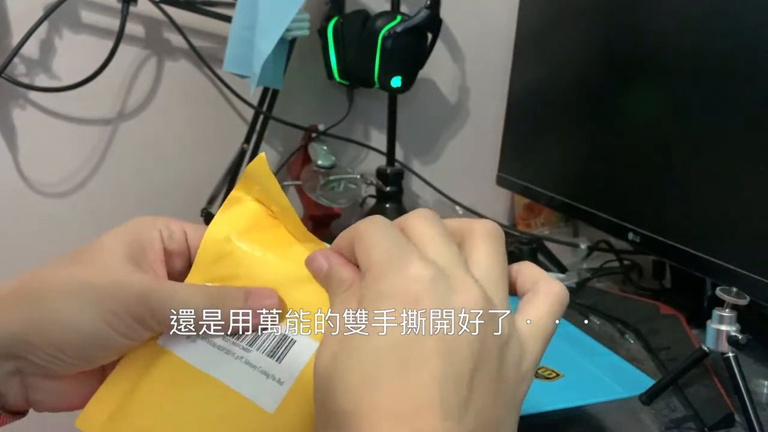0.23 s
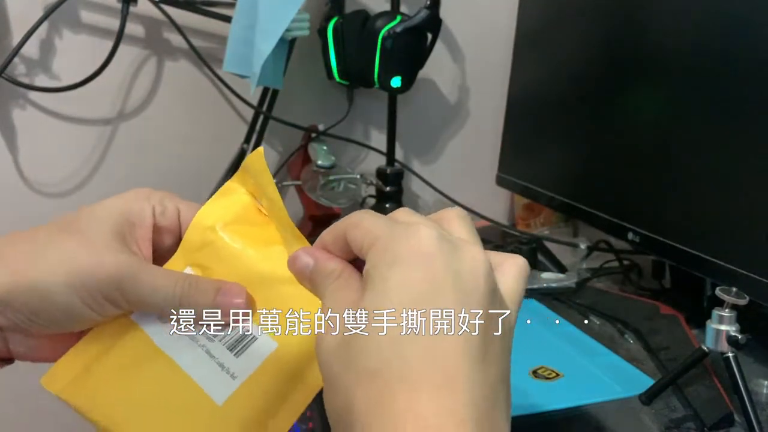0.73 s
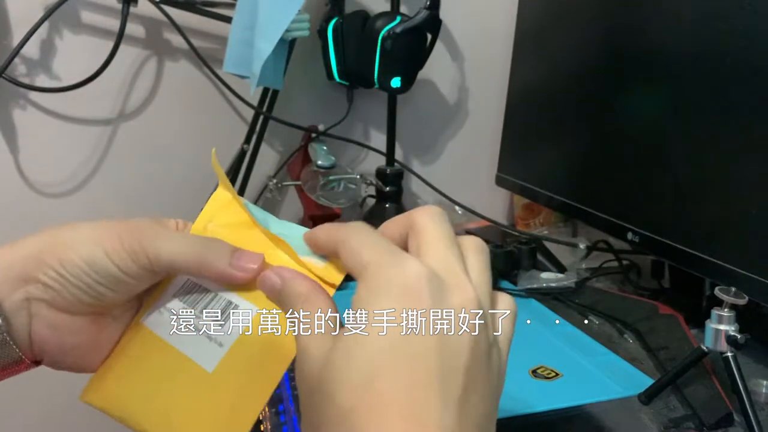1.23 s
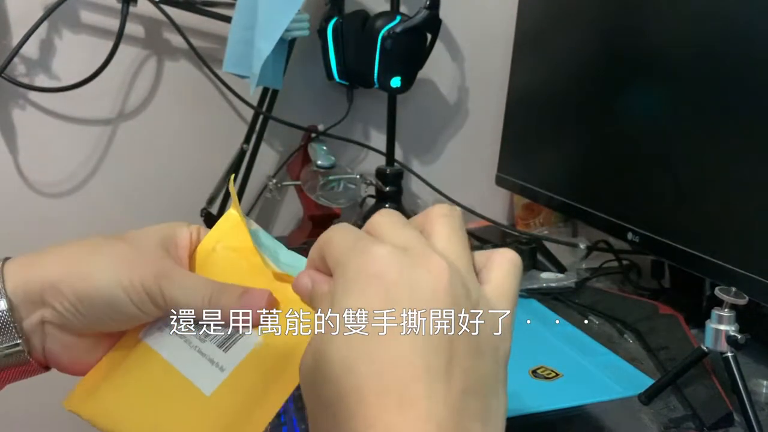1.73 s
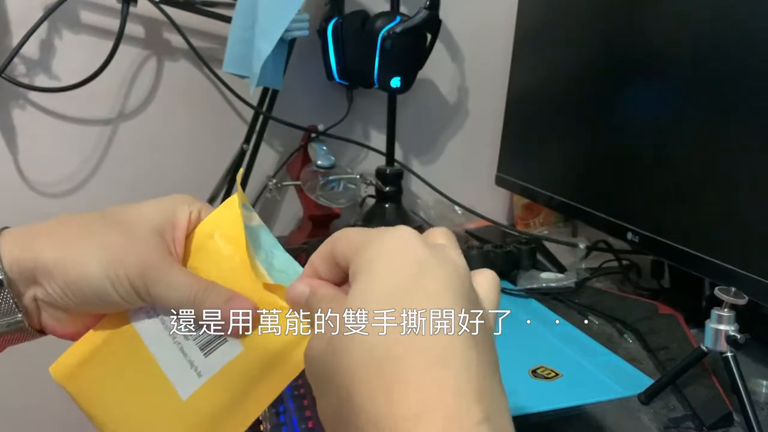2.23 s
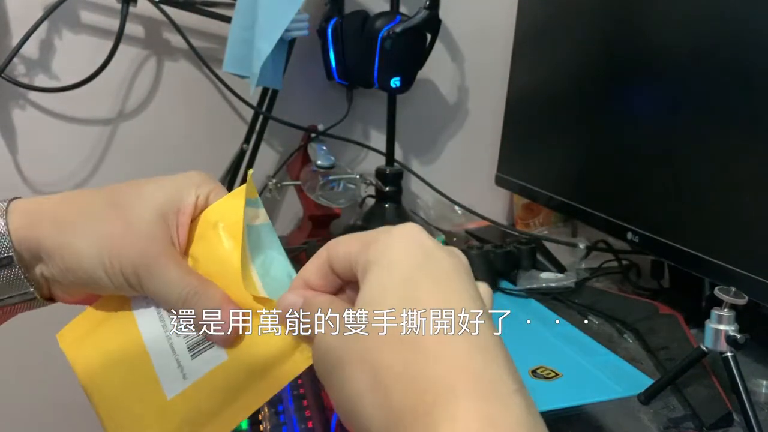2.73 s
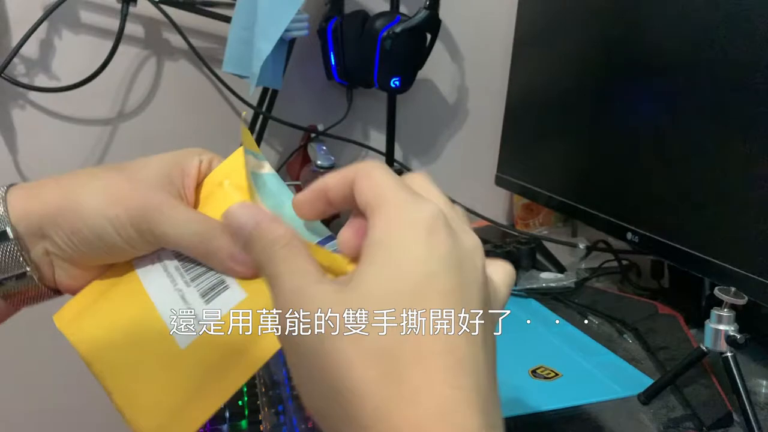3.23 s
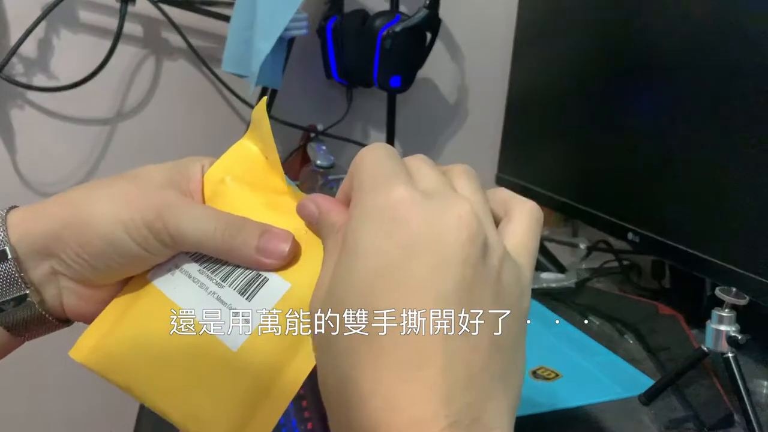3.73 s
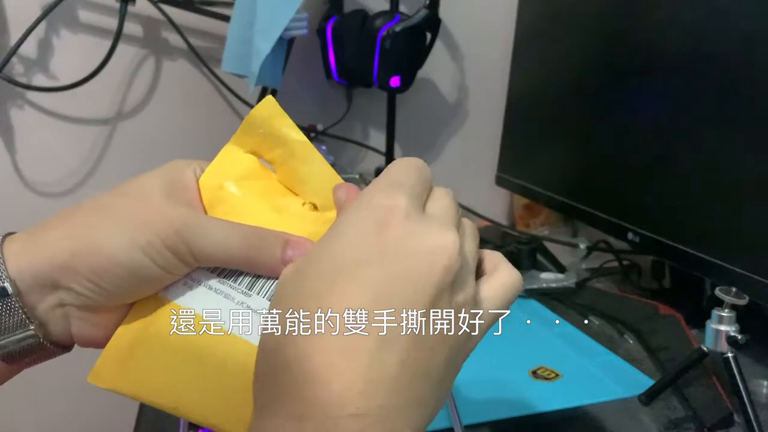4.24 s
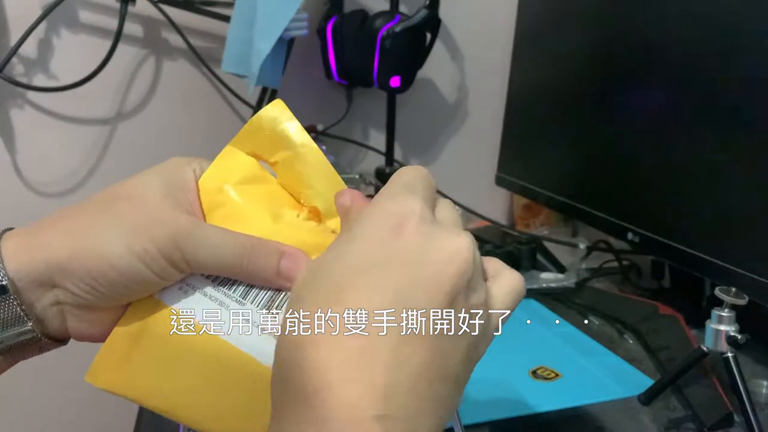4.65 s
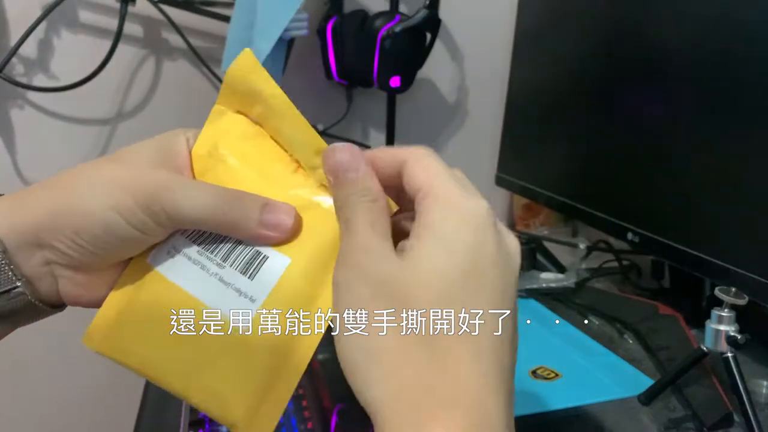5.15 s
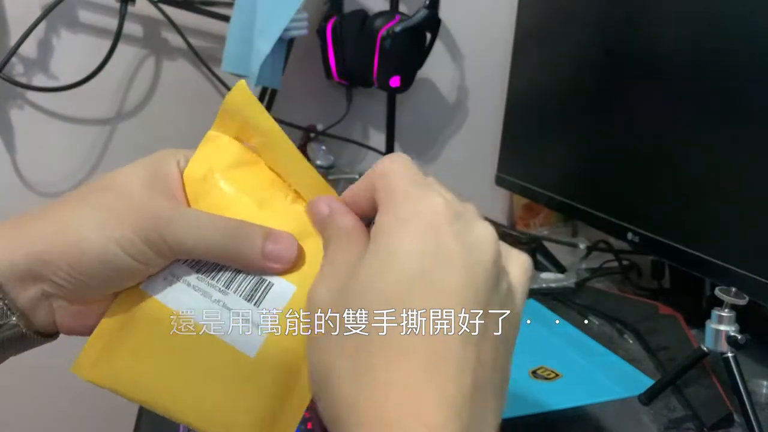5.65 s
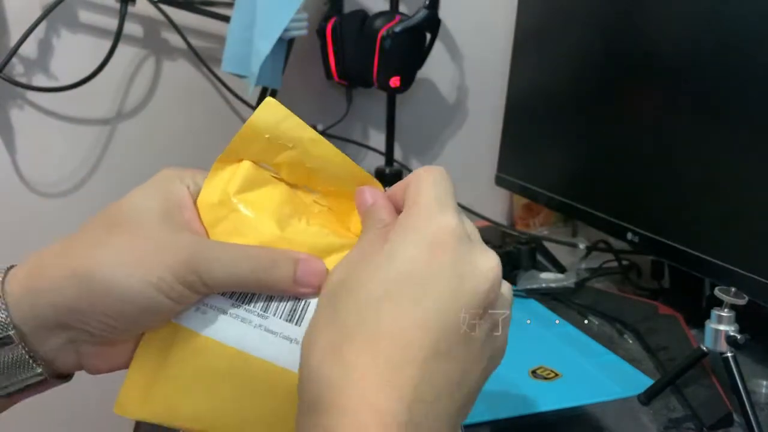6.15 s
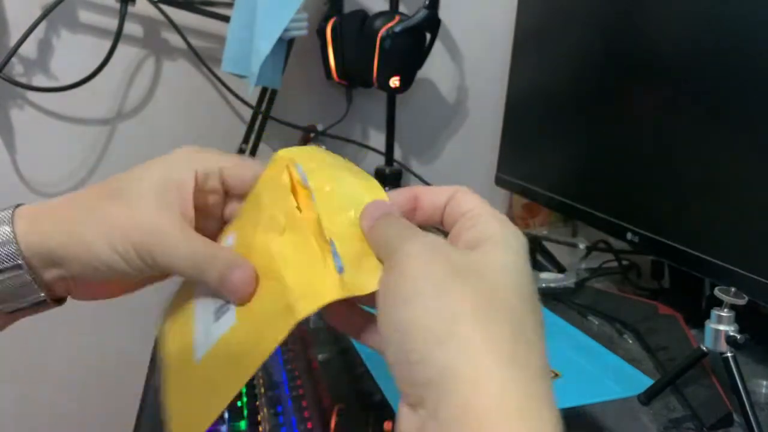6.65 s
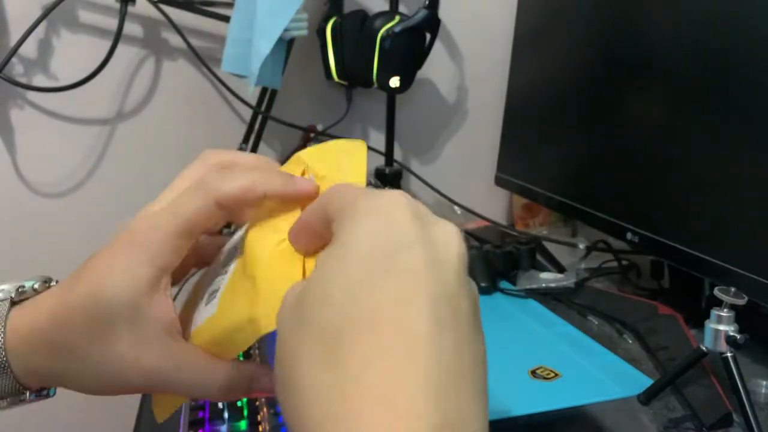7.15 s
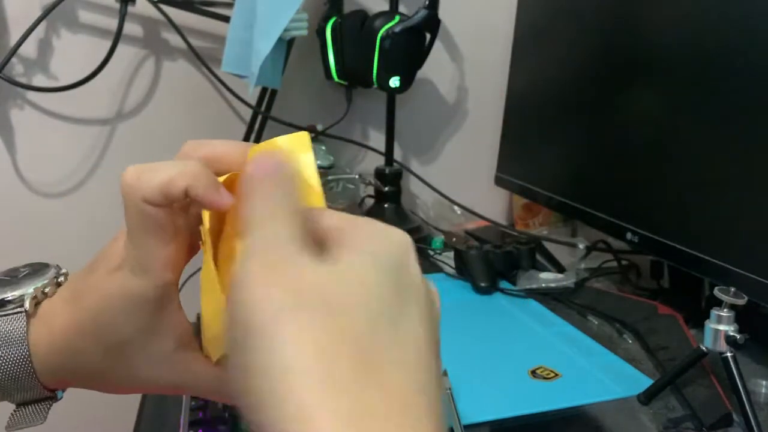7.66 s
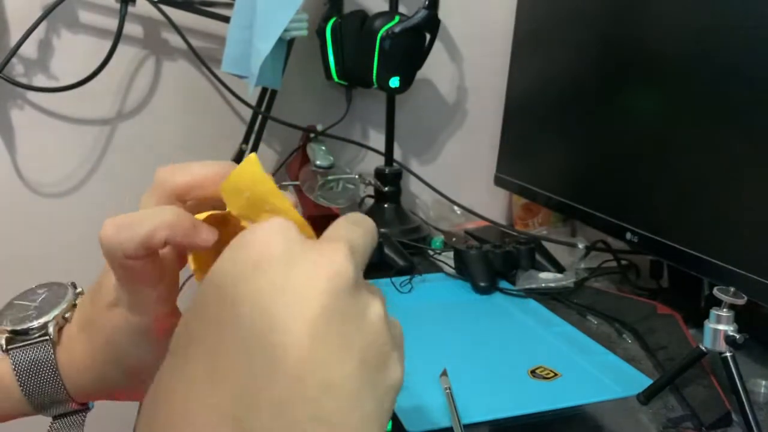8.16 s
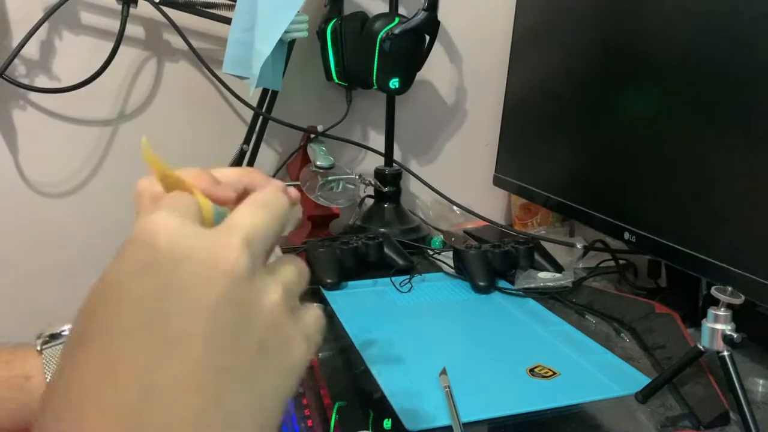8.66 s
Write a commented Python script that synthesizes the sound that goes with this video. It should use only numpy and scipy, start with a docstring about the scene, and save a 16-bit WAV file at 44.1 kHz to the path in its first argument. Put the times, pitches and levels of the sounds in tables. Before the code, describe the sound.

Close, dry paper crackling and sticky popping as a padded mailer is worked open by hand over a faint low room rumble.

```python
"""A low room rumble (shaped noise) and faint microphone hiss (white noise) run throughout.
Hands pick at, peel and tear a padded paper envelope close by: rustle is friction hiss plus tiny creases,
with small creases under the grip and loud snaps as dispersed clicks; a small quiet room adds its tail.
After 5 s a bit of metal rings once (a decaying sine).
After 7 s the packet is bumped four times (sagging, decaying sines)."""
import sys
import numpy as np
from scipy import signal
from scipy.fft import rfft, irfft
from scipy.io import wavfile
from scipy.ndimage import uniform_filter1d

SR = 44100
rng = np.random.default_rng(int(sys.argv[2]) if len(sys.argv) > 2 else 0)


def file_out(sig):
    """Save sig as 16-bit WAV at sys.argv[1]."""
    # one column per channel
    cols = np.atleast_2d(sig).T
    # limit, then scale
    lim = np.clip(cols, -1, 1)
    pcm = np.round(lim * 32767).astype(np.int16)
    wavfile.write(sys.argv[1], SR, pcm)


def volts_from_decibels(level):
    """Turn decibel levels (scalar or array-like) into linear amplitude factors."""
    exponent = np.asarray(level, float) / 20
    return 10 ** exponent


N = 392490


def evened(x):
    """Scales to rms 1."""
    return x / np.sqrt(np.mean(x ** 2) + 1e-20)


def read(points, hz):
    """Interpolates a (f/Hz, value) table on a log-frequency axis."""
    f, value = np.transpose(points)
    return np.interp(np.log(hz + 1), np.log(f + 1), value)


def add(mix, s, sound):
    """Mixes a sound in at time s."""
    part = mix[max(round(s * SR), 0):][:len(sound)]
    part += sound[:len(part)]


# rumble spectrum: f/Hz, relative density/dB
RUMBLE_SHAPE = [(15, -26), (33, 1), (42, -2), (240, -0.5), (609, -6), (680, -7), (948, -10.5),
                (1300, -12.5), (1510, -13.5), (2060, -22.5), (2690, -29), (3510, -25.5), (5000, -34),
                (6500, -70), (11000, -120)]
# rumble level over time: t/s, level/dB
RUMBLE_LEVEL = [(0, -54.5), (2.5, -56.5), (4.9, -56), (5.2, -55), (8.9, -55.5)]
# room resonances: f/Hz, width/Hz, boost/dB
RESONANCES = [(67.4, 15, 7.5), (135, 17, 6), (198.5, 9.4, 8.5), (241.5, 64, 5), (354.5, 51, 3)]


def rumble(swell_rms_db=0.35):
    """Gently swelling noise, strongest where the room resonates."""
    hz = np.fft.rfftfreq(N, 1 / SR)
    boost_db = sum(db / (1 + (2 * (hz - f) / width) ** 2) for f, width, db in RESONANCES)
    shape = volts_from_decibels(read(RUMBLE_SHAPE, hz) + boost_db)
    noise = evened(irfft(rfft(rng.standard_normal(N)) * shape, N))
    t = np.arange(N) / SR
    swell = sum(np.sin(2 * np.pi * (f * t + rng.random())) / np.sqrt(f) for f in np.geomspace(.15, 2, 8))
    level_db = np.interp(t, *np.transpose(RUMBLE_LEVEL)) + swell_rms_db * evened(swell)
    return volts_from_decibels(level_db) * noise


def hiss(rms_db=-99.0):
    """Faint even hiss of the microphone."""
    return volts_from_decibels(rms_db) * rng.standard_normal(N)


# rustle levels below are ahead of the paper colour
# grip that never lets go: t/s, rustle level/dB, brightness/(dB/octave), small crease base peak/dB
GRIP = [(0.0, -54.5, -2, -41.5), (0.2, -58, -9, -53.5), (0.89, -65, -1, -51), (1.2, -56.5, -7, -41),
        (1.75, -61, 2, -56), (1.92, -65, -6, -51.5), (2.2, -70, -3, -60), (2.54, -66, -2.5, -54.5),
        (3.07, -68.5, -2.1, -57.5), (3.22, -51.5, -2.5, -46), (3.5, -62, -9, -48.5), (3.9, -71.5, 4, -54),
        (4.05, -57.5, -4.5, -51), (4.22, -59, 4, -43.5), (4.45, -59, 10, -41), (4.69, -86, -6, -55.5),
        (5.3, -51, 2, -45.5), (5.42, -68.5, -15, -59), (6.02, -68.5, -8, -50.5), (6.42, -55, -2.5, -40.5),
        (6.52, -59, -1, -53), (6.93, -61.5, -3.5, -46), (7.18, -50.5, -0.5, -41), (7.3, -63, 0, -51),
        (7.53, -68, 2, -41), (7.7, -60, 0.4, -41), (7.97, -54, 1.5, -39.5), (8.42, -60.5, -4, -56),
        (8.79, -52, 0, -49.5), (8.9, -59, -3, -52)]
# sheet jerks free, rustle jumps up and fades: t/s, peak level/dB, fade/(dB/s), brightness/(dB/octave), flap f/Hz
JERKS = [(0.102, -41, 160, 0, 1430), (1.093, -42, 92, -3.5, 2930), (1.165, -35.5, 300, -1, 1780),
         (1.762, -34.5, 580, -0.3, 1610), (2.124, -41, 316, -1.5, 2030), (3.238, -32.5, 562, -1.3, 5600),
         (3.634, -58.5, 60, -3, 1130), (3.893, -56.5, 208, -8, 1600), (3.975, -49, 282, -5, 1790),
         (4.37, -39, 144, 0.7, 910), (4.557, -45, 177, 2.5, 1600), (5.2, -38, 240, -4, 1450),
         (5.298, -40.5, 204, -1.5, 875), (5.352, -49, 382, -5.5, 3240), (5.661, -52.5, 143, -0.2, 1590),
         (5.756, -33.5, 168, -1, 3800), (5.913, -47, 177, 3, 1130), (6.327, -23.5, 400, -0.5, 1450),
         (6.587, -40, 250, 1, 1590), (6.953, -47.5, 700, -16, 1290), (7.578, -44, 111, -3, 7200),
         (7.631, -36.5, 283, -1, 1430), (7.986, -46, 54, -1, 1600), (8.073, -37.5, 205, -8, 2600),
         (8.207, -44.5, 73, -1.5, 1050), (8.322, -38.5, 272, 1.5, 2230)]
# finger slides over the sheet: middle t/s, peak level/dB, length/s, brightness/(dB/octave), flap f/Hz
SLIDES = [(0.083, -47.5, .07, -3, 2500), (1.023, -45.5, 0.16, 0.5, 2200), (1.291, -42, 0.092, -0.5, 3600),
          (1.398, -43, 0.1, -0.5, 1600), (1.53, -47, .12, -2.5, 3460), (1.665, -43.5, 0.12, -5.5, 2820),
          (1.6, -52.5, 0.15, -2, 3500), (1.828, -44.5, 0.078, -2.5, 1670), (3.317, -52, 0.19, -4, 1690),
          (3.47, -52.5, 0.2, -2, 1480), (3.578, -61, .09, 2, 1600), (4.32, -55, 0.34, 1.5, 1270),
          (4.897, -57, 0.26, -6.5, 1560), (5.14, -48, 0.11, -1.5, 890), (5.591, -48, 0.069, -2.2, 1610),
          (6.259, -48.5, 0.14, -2, 3600), (6.318, -41, .03, 0, 1500), (6.66, -45, 0.18, -2.1, 4020),
          (6.777, -46, 0.18, 2.5, 3440), (7.231, -41.5, 0.074, -2.5, 5300), (7.419, -47, 0.17, -2.5, 5660),
          (7.518, -47, 0.12, -1, 880), (8.043, -40, 0.094, 0.1, 1160), (8.24, -40, .07, -3.5, 1050),
          (8.283, -38.5, 0.2, -2.5, 1440), (8.539, -44, 0.11, -2, 1610), (8.697, -49, 0.17, -5.5, 2030)]


def handling(t, grip_flap_hz=1400, jerk_rise_db_per_s=1602, slide_ends_db=-19):
    """Rustle level, brightness and flap pitch: grip, jerks and slides add in power, which weights their colour."""
    s, grip_db, grip_tilt, _ = np.transpose(GRIP)
    at, db, fade, jerk_tilt, jerk_hz = np.transpose(JERKS)[:, :, None]
    jerks_db = db - np.where(t > at, fade, -jerk_rise_db_per_s) * (t - at)
    mid, top_db, length, slide_tilt, slide_hz = np.transpose(SLIDES)[:, :, None]
    slides_db = top_db + slide_ends_db * (2 * (t - mid) / length) ** 2
    power = volts_from_decibels(2 * np.vstack([np.interp(t, s, grip_db), jerks_db, slides_db]))
    share = power / power.sum(0)
    tilt = np.interp(t, s, grip_tilt) * share[0]
    tilt = tilt + (np.vstack([jerk_tilt, slide_tilt]) * share[1:]).sum(0)
    flap_log2_hz = (np.log2(np.vstack([[grip_flap_hz], jerk_hz, slide_hz])) * share).sum(0)
    return 10 * np.log10(power.sum(0)), tilt, flap_log2_hz


def snap(hz, low_db, high_db, luck, lag_ms, ring_db=6, ring_octaves=.3, spread_ms=0.89):
    """One crease: a click whose treble arrives first, as bending waves run faster at high pitch."""
    f = np.fft.rfftfreq(1024, 1 / SR) + 1
    colour_db = read([(60, low_db - 58), (250, low_db - 8), (600, low_db - 5.0), (1300, low_db + 0.055),
                      (2600, 0.064), (6000, 0.28), (9000, high_db + 0.42),
                      (12500, high_db - 4.0), (16000, high_db - 7.5)], f)
    colour_db = colour_db + ring_db * np.exp(-(np.log2(f / hz) / ring_octaves) ** 2)
    phase = -4 * np.pi * lag_ms / 1000 * np.sqrt(1000 * f)  # delay = lag x sqrt(1 kHz / f)
    t = np.arange(len(luck)) / SR
    folds = .13 * luck ** 3 * np.exp(-t * 1000 / spread_ms)  # the crease gives way in a few quick slips
    folds[0] = 1
    x = irfft(volts_from_decibels(colour_db) * np.exp(1j * phase) * rfft(folds, 1024))
    x = np.roll(x, 88 - np.argmax(abs(x)))[:896]  # peak 2 ms in
    x = x * signal.windows.tukey(896, .1)
    return x / abs(x).max()


# paper colour: f/Hz, relative density/dB
PAPER = [(80, -52), (300, -15), (700, -6), (1500, -9), (3500, -7), (6000, -6), (9000, -11.5),
         (13000, -11.5), (16500, -23.5)]


def rustle(hiss_db=1.0, grains_db=-2, patchy_db=2.48, flicker_db=2.0):
    """Skin drags on the sheet: patchy friction hiss and a spray of tiny creases."""
    kinds, grains_per_s, flap_db, flap_octaves = 18, 600, 7, .28
    size = volts_from_decibels(3.0 * np.minimum(rng.exponential(1, N), 3.8))
    size = size * (rng.random(N) < grains_per_s / SR)
    kind, grains = rng.integers(0, kinds, N), np.zeros(N)
    for k, ring_hz in enumerate(np.geomspace(1000, 12000, kinds)):
        shape = snap(ring_hz, 0.95, 2.5, rng.standard_normal(160), 1.5, ring_db=6.5, spread_ms=0.27)
        grains += signal.oaconvolve(size * (kind == k), shape)[:N]
    drive = volts_from_decibels(hiss_db) * rng.standard_normal(N) + volts_from_decibels(grains_db) * evened(grains)
    hz, t, z = signal.stft(drive, SR, nperseg=256, noverlap=192)
    patches = uniform_filter1d(rng.standard_normal(z.shape[::-1]), 14, 0)  # along time
    patches = evened(uniform_filter1d(patches, 8, 1)).T  # along frequency
    flicker = evened(uniform_filter1d(rng.standard_normal(len(t)), 5))
    level_db, tilt, flap_log2_hz = handling(t)
    octaves = np.log2(np.maximum(hz, 2200)[:, None] / 4000)
    colour_db = read(PAPER, hz)[:, None] + octaves * tilt
    from_flap = np.log2(hz[:, None] + 1) - flap_log2_hz
    colour_db += flap_db * np.exp(-(from_flap / flap_octaves) ** 2)
    z = z * volts_from_decibels(colour_db + patchy_db * patches + flicker_db * flicker)
    sheet = signal.istft(z, SR, nperseg=256, noverlap=192)[1][:N]
    return volts_from_decibels(np.interp(np.arange(N) / SR, t, level_db)) * sheet


def creases(per_s=32, spread_db=1.5):
    """Small creases give way at random under the grip, each with its own colour."""
    s, _, _, level_db = np.transpose(GRIP)
    count = round(per_s * N / SR)
    out, luck, pick = np.zeros(N), rng.standard_normal((count, 243)), rng.random((count, 3))
    for row, (when, pitch, size) in zip(luck, pick):
        at = when * N / SR
        hz = 1300 * (11000 / 1300) ** pitch ** .6
        db = np.interp(at, s, level_db) - spread_db * np.log(1 - .97 * size)
        low_db = 3 - 8 * pitch + 5 * row[1]  # high rings are thin and bright
        high_db = -16 + 19 * pitch + 4 * row[2]
        lag_ms = 1.4 * np.exp(.3 * row[0])
        add(out, at, volts_from_decibels(db) * snap(hz, low_db, high_db, row[3:], lag_ms, ring_db=13.5, ring_octaves=.6))
    return out


# room decay: f/Hz, t60/s
ROOM_T60 = [(500, 0.18), (1500, 0.15), (4000, 0.11), (10000, 0.094)]


def room(x):
    """Three tails of sparse taps, taken in turn, each band dying at its own speed."""
    out, half_turns = np.zeros(N), np.arange(N) / SR * 7
    for k in range(3):
        taps = np.zeros(SR // 3)
        at = np.arange(90, len(taps) - 12, 12)  # samples
        taps[at + rng.integers(0, 12, len(at))] = rng.choice([-1., 1.], len(at))
        hz, t, z = signal.stft(taps, SR, nperseg=128)
        decay = volts_from_decibels(-60 * t / read(ROOM_T60, hz)[:, None])
        tail = signal.istft(z * decay, SR, nperseg=128)[1]
        share = np.sqrt(2 / 3) * np.cos(np.pi * (half_turns + k / 3))  # powers sum to 1
        out += signal.oaconvolve(x * share, tail / np.linalg.norm(tail))[:N]
    return out


# loud creases and glue spots: t/s, peak level/dB, ring f/Hz, low part/dB, high part/dB
SNAPS = [(0.1014, -21.5, 1530, 10.5, -31), (0.1127, -30.5, 3360, -7, -20), (0.1428, -38, 2150, -4, -14),
         (0.1542, -33.5, 3570, -2, -7), (0.2445, -34, 10700, -15, 1), (0.419, -42.5, 2650, -4, -38),
         (0.5474, -35, 6590, -2, -8), (0.6705, -37.5, 7920, -11, -2), (0.7433, -42.5, 5400, 5, 1),
         (0.8269, -42, 11730, -8, 13), (0.8976, -41.5, 8230, 4, -3.5), (0.977, -29.5, 2780, 0.5, -29),
         (0.9934, -29.5, 2860, 1, -12), (1.0066, -31.5, 1030, 2.5, -20.5), (1.045, -34.5, 4480, -1, -17),
         (1.095, -32.5, 3660, -21, -19), (1.124, -34, 1600, 9, -14), (1.162, -17.5, 1680, 2, -4.5),
         (1.172, -20.5, 3060, -3, -13), (1.405, -32, 2110, -4, -17), (1.6716, -36, 2760, -10, -34),
         (1.7626, -26, 3300, -19, -20), (2.0846, -40, 3320, 8, -6), (2.117, -28, 1770, 6, -4),
         (2.128, -29, 6800, 0, -4), (2.5539, -31.5, 9400, -8, 0), (2.6035, -32.5, 8140, -1, 4.5),
         (2.685, -41, 5230, -4, -8), (2.742, -47, 4000, -4, -18), (2.9054, -38.5, 8050, -8, -3.5),
         (3.0884, -36, 1210, 6, -12), (3.1826, -36.5, 4390, 8, -6), (3.2355, -22.5, 4730, 6, -1),
         (3.2395, -24, 6570, 13.5, -1), (3.36, -43, 2500, 9, -19), (3.496, -38, 1760, 4, -12),
         (3.562, -34.5, 7450, 0, -2), (3.566, -31.5, 1510, 5, -5), (3.639, -40, 1290, 11.5, -15),
         (3.8957, -31.5, 960, 15.5, -20), (3.959, -17.5, 1600, 3, -6.5), (3.9837, -33, 4830, 3, -3),
         (4.1459, -33, 1510, -1, 4), (4.222, -39, 7150, 6, 5), (4.2749, -25, 1670, 3, 1),
         (4.3154, -29.5, 1600, 2.5, -2), (4.3268, -32, 7320, -11, 2), (4.3329, -35, 7150, -5, 2),
         (4.3643, -28.5, 7060, 1, 2), (4.4076, -27.5, 3500, -2, -1.5), (4.4325, -26.5, 1530, 13, 2),
         (4.4411, -28, 1440, 5, 1), (4.4813, -27, 8460, -14, 7), (4.511, -35, 1510, 5, 3),
         (4.534, -33, 14000, -8, 13), (4.553, -20.5, 6300, -3, 20), (4.5557, -13.5, 1400, -1.5, -5.5),
         (4.9007, -36, 1680, 8, -9), (4.9516, -34.5, 6100, -26, -6), (5.2879, -33, 7880, 11, 4),
         (5.2938, -18.5, 2840, 7, 1.5), (5.298, -26.5, 600, 15, -15), (5.3416, -26.5, 3570, -10, -6.5),
         (5.3522, -21.5, 3620, -17, -1.5), (5.3568, -30.5, 1640, 11, -19), (5.5945, -33, 1750, 10, -22),
         (5.7486, -21.5, 3900, 0, -20.5), (5.7515, -11, 3800, 2, -11.5), (5.759, -15.5, 3700, -3, -17),
         (5.7616, -14.5, 3900, 2, -15), (5.7816, -32, 3620, 2, -2), (5.789, -19.5, 2950, 0, -2),
         (5.8245, -27, 3420, 4.5, -8), (5.912, -12, 6600, -8.5, -10), (5.9166, -18, 10900, -2, 1),
         (5.9797, -35, 5400, -3, -7), (6.2064, -43, 4740, 3, -4), (6.2194, -34, 1640, 6, -5),
         (6.243, -19.5, 3600, 3, -16), (6.2727, -29, 11670, 10, 3), (6.2796, -26.5, 3500, 5, -5),
         (6.301, -32, 1510, 1, -7), (6.3253, -6.5, 1910, 5.5, -2.5), (6.4497, -41, 1660, 17, -13),
         (6.5479, -32, 3500, -10, -4), (6.507, -41, 4870, -7, -9), (6.5803, -38, 3790, 10, -17),
         (6.5855, -24.5, 12960, 12, 11.5), (6.5917, -18, 5330, -4, 1.5), (6.6214, -24.5, 6070, -1, 5),
         (6.659, -23, 4040, 4.5, -15), (6.7823, -25.5, 2180, 0, -3.5), (6.948, -36, 1460, 10, -30),
         (7.1952, -20.5, 6600, -6, 0.5), (7.22, -28.5, 2540, 3, -6), (7.2653, -37, 5150, -13, -7),
         (7.3107, -40, 5230, -9, -13), (7.352, -32, 8530, -9, 3), (7.375, -32, 1460, 3.5, -5),
         (7.392, -34, 3660, 9, -5), (7.455, -36.5, 845, 15, 0), (7.4813, -34, 6630, -3, 0),
         (7.502, -38, 6000, -4, -1.5), (7.5119, -29.5, 7150, -7, 7), (7.5193, -28, 7800, -10, 3),
         (7.5353, -36.5, 780, 23, -3), (7.559, -34, 10000, -5, 2), (7.5782, -18.5, 840, 8.5, -5.5),
         (7.606, -30, 2500, 1, -10), (7.6327, -19.5, 2460, 6.5, -4.5), (7.7135, -35, 3340, 9, -1),
         (7.796, -34, 3620, 0, 2), (7.875, -34, 6120, 4, 3), (7.942, -38, 8660, -4, 9),
         (7.983, -27.5, 5030, -3, -2), (8.0162, -31, 1390, 10, -21), (8.062, -25, 8310, -3, -8),
         (8.0696, -18, 2200, 1.5, -6), (8.0728, -21, 2757, -6, -22), (8.089, -34, 2300, -6, -15),
         (8.147, -38, 900, 27, -20), (8.208, -39, 1050, 18, -5), (8.3226, -30, 5210, -7, 0),
         (8.376, -37, 12060, 6, 20), (8.5108, -36, 7490, 8, 2)]


def snaps():
    """Loud creases and glue spots give way one by one, each a dispersed click."""
    out, luck = np.zeros(N), rng.standard_normal((len(SNAPS), 241))
    for (s, db, hz, low_db, high_db), row in zip(SNAPS, luck):
        lag_ms = 1.7 * np.exp(.3 * row[0])
        add(out, s - 2 / 1000, volts_from_decibels(db) * snap(hz, low_db, high_db, row[1:], lag_ms))
    return out


# metal ring: level/dB, f/Hz, t60/s
TINK = (-73, 10260, .6)


def tink(at_s=5.351):
    """A small metal part rings faintly on one high mode."""
    out, (db, hz, t60_s), t = np.zeros(N), TINK, np.arange(SR) / SR
    add(out, at_s, volts_from_decibels(db - 60 * t / t60_s) * np.sin(2 * np.pi * hz * t))
    return out


# packet bumped by a hand: t/s, level/dB before attack and decay, nominal f/Hz (sags from 1.6x to 0.86x)
BUMPS = [(7.214, -41.5, 363), (8.026, -42, 98), (8.276, -31.5, 139), (8.328, -36.5, 135)]


def bumps(t60_s=.12, sag_s=.006, attack_s=0.0011):
    """Dull thumps whose pitch sags as the padding gives."""
    out, t = np.zeros(N), np.arange(SR // 8) / SR
    for s, db, hz in BUMPS:
        turns = np.cumsum(hz * (0.86 + 0.74 * np.exp(-t / sag_s))) / SR
        envelope = volts_from_decibels(db - 60 * t / t60_s) * (1 - np.exp(-t / attack_s))
        add(out, s, envelope * np.sin(2 * np.pi * turns))
    return out


def scene(room_db=-11.5):
    """Floor, paper near the microphone with its room tail, metal ring and bumps."""
    paper = rustle() + creases() + snaps()
    return (rumble() + hiss() + paper + volts_from_decibels(room_db) * room(paper) + tink() + bumps())[None]


def roll_off(x):
    """The treble ends steeply here."""
    return signal.sosfilt(signal.butter(12, 16970, fs=SR, output="sos"), x)


def record(dry):
    """Limits the band with a linear-phase low-pass."""
    edge = signal.firwin(255, 16800, window=("kaiser", 9), fs=SR)  # cutoff in Hz
    return roll_off(signal.oaconvolve(dry, edge[None], "same"))


dry = scene()
out = record(dry)
file_out(out)
```